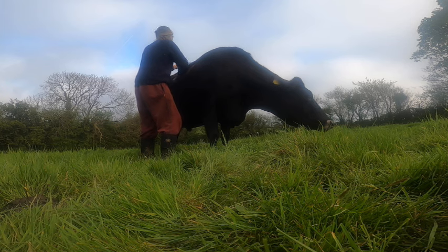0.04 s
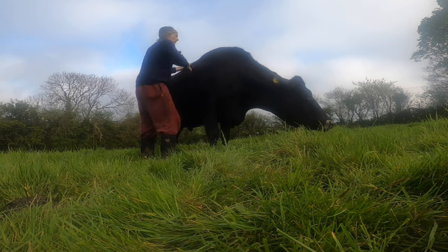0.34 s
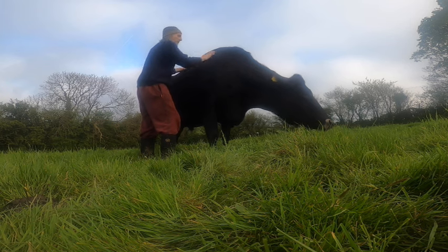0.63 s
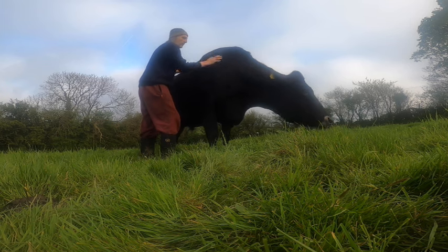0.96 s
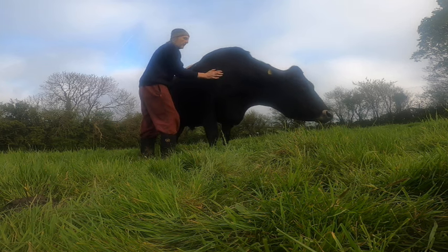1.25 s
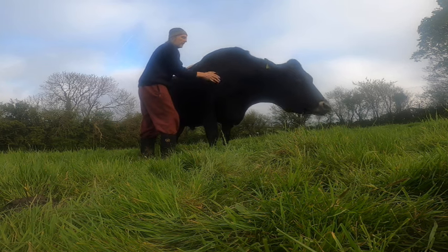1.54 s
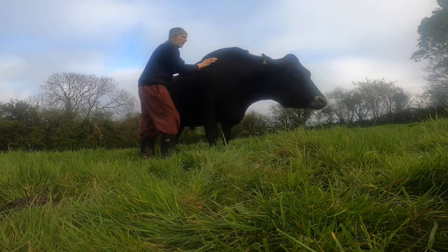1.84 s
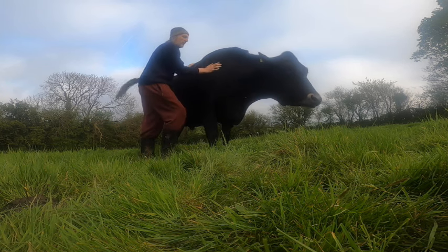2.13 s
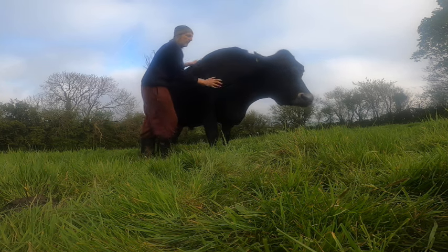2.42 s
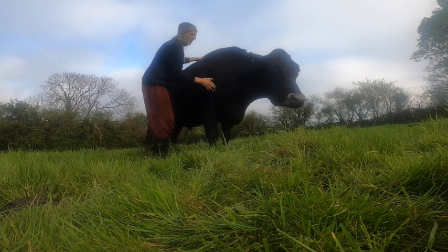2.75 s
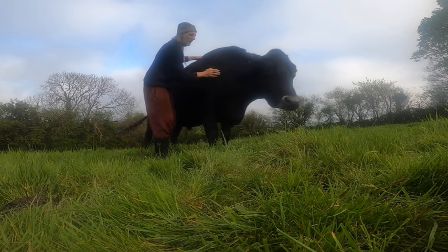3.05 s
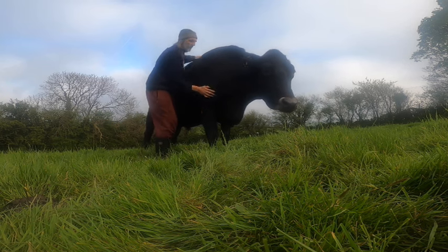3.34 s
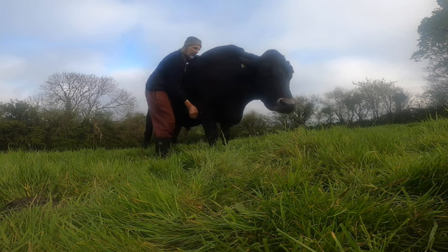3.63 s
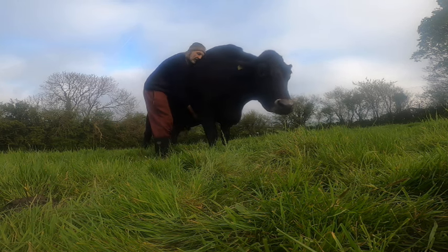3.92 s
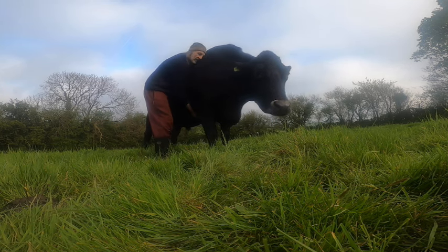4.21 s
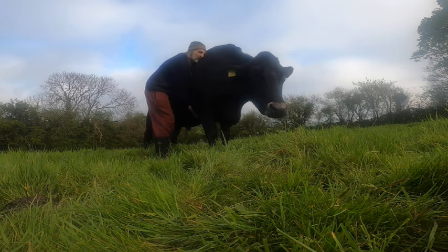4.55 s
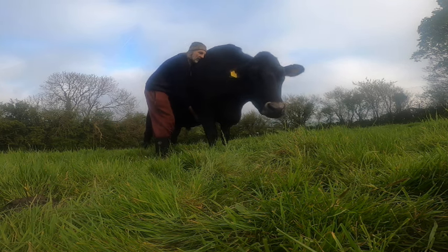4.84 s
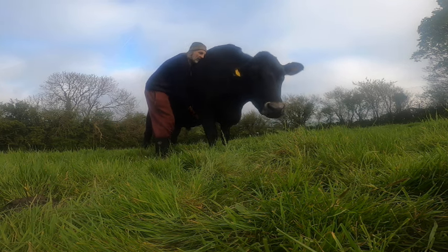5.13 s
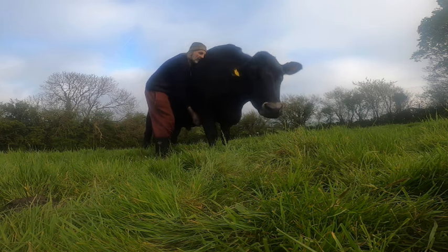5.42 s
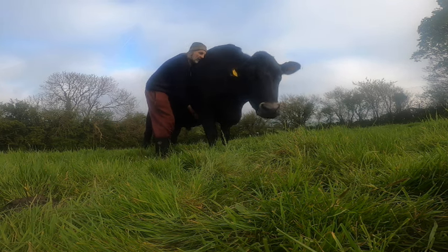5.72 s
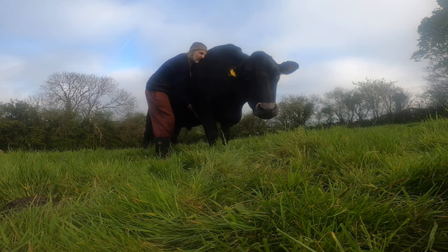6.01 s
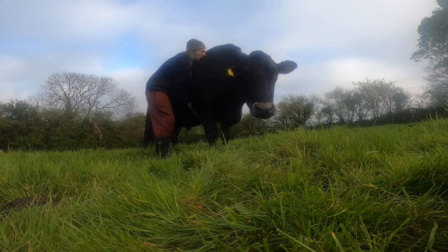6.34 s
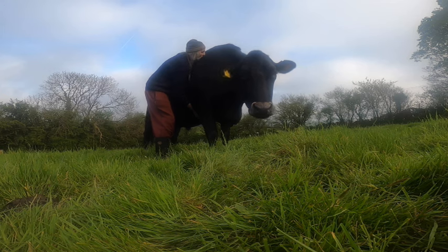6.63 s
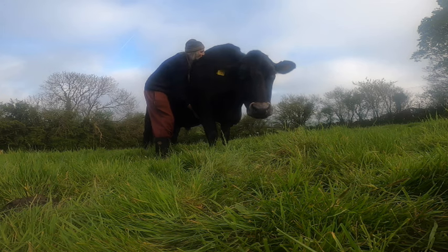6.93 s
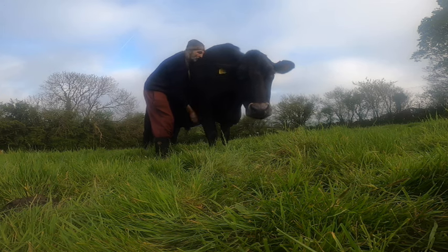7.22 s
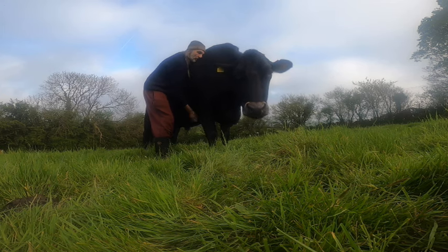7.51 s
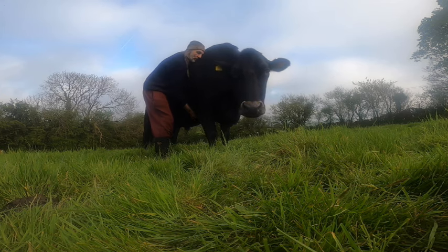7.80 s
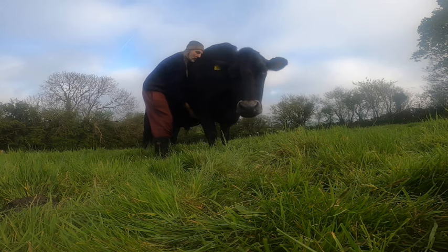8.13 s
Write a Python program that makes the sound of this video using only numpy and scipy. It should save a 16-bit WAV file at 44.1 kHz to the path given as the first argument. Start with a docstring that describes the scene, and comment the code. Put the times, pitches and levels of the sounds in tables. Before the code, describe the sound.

Fluting, trilling birdsong carries over a pasture, with far engine drone and wind on the microphone that stop partway through.

```python
"""Pasture birdsong

A blackbird flutes and trills in gliding near-pure tones; others answer and wheeze from the hedges, and a small
bird repeats high slurs. Twigs blur the notes and trees echo them. Distant engines drone and wind buffets a
microphone low in the grass; near five seconds the bass, engines and buffeting alike, drops away abruptly. Grass
rustles and ticks as blades brush and stalks snap, and a hand pats a cow with dull thuds."""
import sys
import numpy as np
from scipy import signal
from scipy.fft import rfft, irfft, next_fast_len
from scipy.io import wavfile
from scipy.ndimage import uniform_filter1d

SR = 44100
rng = np.random.default_rng(int(sys.argv[2]) if len(sys.argv) > 2 else 0)


def waveform_to_disk(signal):
    """Save audio, clipped to [-1, 1], as 16-bit WAV at the path in sys.argv[1]."""
    frames = np.transpose(np.atleast_2d(signal))
    scaled = np.clip(frames, -1, 1) * 32767
    samples = np.round(scaled).astype(np.int16)
    wavfile.write(sys.argv[1], SR, samples)


N = 360076
TIME = np.arange(N) / SR
BASS_DROP_S, BASS_FALL_S = 4.865, 0.02  # the bass, engines and buffeting alike, drops away abruptly


def undb(db):
    """Decibels to gain."""
    return 10 ** (np.asarray(db) / 20)


def unit(x):
    """Scale to rms 1."""
    return x / np.sqrt(np.mean(x ** 2))


def pan(db):
    """Stereo gains, left over right by db."""
    return undb(np.array([[db], [-db]]) / 2)


def walk(rate_hz):
    """Smooth random drift, spread near 1."""
    k = max(int(SR / rate_hz), 1)
    steps = np.repeat(rng.standard_normal(N // k + 1), k)
    return 1.36 * uniform_filter1d(uniform_filter1d(steps, k), k)[:N]


def noise(spectrum, correlation):
    """Coloured stereo noise; correlation 1 is mono."""
    size = next_fast_len(N)
    hz, db = np.transpose(spectrum)
    f = np.fft.rfftfreq(size, 1 / SR) + 1
    gain = undb(np.interp(np.log(f), np.log(hz), db)) / (1 + (f / (2 * hz[-1])) ** 2)
    mid, side = irfft(rfft(rng.standard_normal((2, size))) * gain, size)[:, :N]
    width = np.sqrt((1 - correlation) / (1 + correlation))
    return unit(mid) + width * unit(side) * np.array([[1], [-1]])


def add(track, start_s, sound):
    """Mix a sound into a track."""
    i = max(int(start_s * SR), 0)
    track[i:i + len(sound)] += sound[:N - i]


def lagged(x, lag_ms):
    """Fractional-sample delay."""
    size = next_fast_len(N + SR)
    khz = np.fft.rfftfreq(size, 1000 / SR)
    return irfft(rfft(x, size) * np.exp(-2j * np.pi * khz * lag_ms), size)[:N]


def held(start_s, end_s, rise_s, fall_s):
    """Trapezoid envelope; the fall begins at end_s."""
    return np.clip((TIME - start_s) / rise_s, 0, 1) * np.clip(1 - (TIME - end_s) / fall_s, 0, 1)


def swells(rows):
    """Envelope with one smooth hump per row."""
    out = np.zeros(N)
    for s, length_s, db in rows:
        add(out, s, undb(db) * np.hanning(int(length_s * SR)))
    return out


def bass_gate():
    """1 until the bass drops away, then a fast ramp to 0."""
    return np.clip(1 - (TIME - BASS_DROP_S) / BASS_FALL_S, 0, 1)


def whistle(hz, attack_s, release_s):
    """Sine on a pitch contour, with soft ends."""
    t = np.arange(len(hz)) / SR
    gate = np.clip(t / attack_s, 0, 1) * np.clip((t[-1] - t) / release_s, 0, 1)
    return np.sqrt(2) * np.sin(np.pi / 2 * gate) ** 2 * np.sin(2 * np.pi * np.cumsum(hz) / SR)


def fluting(notes, attack_share, release_s, waver, trill_dip, swell_db, rasp):
    """Notes swell and bend; each trill cycle flicks the pitch up and dips the level."""
    # name: start/mid pitch, end/mid pitch, lean (<1 bends early)[, trill/Hz, depth, dip lead/rad]
    gestures = { "hold": (0.95, 0.97, 1), "droop": (1.05, .9, 0.97), "sink": (1.06, 0.774, 0.93),
                "scoop": (1.08, 1.06, 0.96), "sag": (1.18, .94, 1), "rise": (.94, 1.06, 1),
                "lift": (.8, 1.04, .7), "climb": (.82, 1.16, 1), "crest": (.87, .83, .66),
                "chip": (1.345, 0.78, .7, 106, 0.069, 1.5), "trill": (1.06, 1.1, 0.5, 54, .065, 0.5),
                "roll": (0.73, 0.93, 1, 46.5, .1, 0.3), "warble": (1.07, .96, 1, 40.5, 0.046, 0.75),
                "quaver": (1.01, .975, 1.05, 33, .035, 0.76), "buzz": (1, 1, 1, 52, 0.0226, .5)}
    out, drift, shake = np.zeros(N), walk(150), walk(900)
    for s, length_s, gesture, mid_hz, db in notes:
        start, end, lean, *trill = gestures[gesture]
        trill_hz, depth, lead_rad = trill or (0, 0, 0)
        t = np.arange(int(length_s * SR)) / SR
        now = slice(int(s * SR), int(s * SR) + len(t))
        parabola = np.polyfit([0, .5, 1], [start, 1, end], 2)
        bend = np.polyval(parabola, (t / length_s) ** lean)
        phase = 2 * np.pi * trill_hz * t
        flick = depth * (np.exp(np.sin(phase)) - 1 + rasp * shake[now])  # deep trills turn raspy
        hz = mid_hz * (bend + flick) * (1 + waver * drift[now])
        tone = whistle(hz, attack_share * length_s, min(release_s, length_s / 3))
        pulsing = 1 - trill_dip * np.sin(phase + lead_rad) if trill else 1
        swell = undb(db - swell_db * (2 * t / length_s - 1) ** 2)
        add(out, s, swell * tone * pulsing)
    return out


def outdoors(x, pan_db, lag_ms, echo_db, t60_s, flutter_db, scatter_db, scatter_s):
    """Moving air flutters the level, twigs blur it, trees echo; the left channel lags."""
    x = x * undb(flutter_db * walk(45))
    t = np.arange(SR) / SR
    twigs = rng.standard_normal((2, SR)) * t * np.exp(-t / scatter_s)
    trunks = rng.standard_normal((2, SR)) * (rng.random(SR) < 150 / SR)  # about 150 echoes/s
    trees = trunks * np.exp(-np.log(1000) * t / t60_s) * (1 - np.exp(-t / 0.043))
    tail = (undb(scatter_db) * unit(twigs) + undb(echo_db) * unit(trees)) / np.sqrt(SR)
    echo = signal.fftconvolve(x[None], tail, axes=1)[:, :N]
    direct = np.array([lagged(x, lag_ms), x])
    return (direct + echo) * pan(pan_db) / np.hypot(1, undb(scatter_db))


def air(wind_start_s=1.98, wind_db=-38.5, far_db=-49, calm_db=-78):
    """Eddies buffet the microphone, mostly on the right, over a far rumble and hissing grass."""
    # wind gusts: t/s, length/s, level/dB
    gust_times = [(1.9, 0.9, -50), (3.58, 0.38, -38), (4.17, 0.15, -39.5), (4.5, 0.68, -47)]
    # breezes over the grass: start/s, end/s, level/dB
    breezes = [(-.2, 0.876, -65.5), (0.997, 1.96, -69.5), (3.788, 5.06, -69)]
    # noise spectra: f/Hz, density/dB
    buffet_spectrum = [(8, 5), (22, 0), (40, -10), (65, -14.5), (130, -24), (250, -47)]
    rumble_spectrum = [(20, -15), (45, 4), (70, 0), (115, -2.5), (170, -7.5), (230, -16.5), (300, -29.5),
                       (600, -43)]
    hiss_spectrum = [(300, 14), (1000, 6.5), (3000, 11.5), (4600, 7.5), (7500, 1.5), (9500, -4),
                     (12000, -10), (15500, -24)]
    field_spectrum = [(200, 7), (400, 6), (620, -3.5), (800, -9.5), (1300, -2), (2100, 4), (3000, -13.5),
                      (3900, -7.5), (7000, -16.5), (15000, -27.5)]
    blowing = held(wind_start_s, BASS_DROP_S, rise_s=0.041, fall_s=BASS_FALL_S)
    gusts = swells(gust_times)
    buffet = blowing * (undb(wind_db) + gusts) * noise(buffet_spectrum, correlation=0.85) * pan(-10)
    rumble_gain = (undb(far_db) + undb(-5.5) * blowing * gusts) * undb(1.7 * walk(6))
    rumble = rumble_gain * noise(rumble_spectrum, correlation=0.88)
    breeze = sum(undb(db) * held(start, end, rise_s=0.053, fall_s=0.31) for start, end, db in breezes)
    hiss = (undb(calm_db) + breeze) * undb(1.5 * walk(13)) * noise(hiss_spectrum, correlation=0.07)
    field = undb(-69.5 + 1.78 * walk(2.12)) * noise(field_spectrum, correlation=0.086)
    left, right = hiss + field
    return buffet + rumble + np.array([lagged(left, lag_ms=0.14), right])


def hum(fade_s=0.94, late_hz=228.8, late_db=-69):
    """A faint wavering hum dies away; a lower one holds after the bass drops."""
    # opening hum lines: f/Hz, level/dB
    lines = [(394, -67.5), (700, -76)]
    clock_s = np.cumsum(1 + 0.0058 * walk(30)) / SR
    early = sum(undb(db + 3.5 * walk(15)) * np.sin(2 * np.pi * hz * clock_s) for hz, db in lines)
    late = undb(late_db + 2.0 * walk(6.3)) * np.sin(2 * np.pi * late_hz * clock_s)
    return np.exp(-TIME / fade_s) * early + (1 - bass_gate()) * late


def sizzle(start_s=4.88, fade_s=.55, db=-75):
    """A thin band of high noise sets in and fades."""
    # sizzle spectrum: f/Hz, density/dB
    spectrum = [(7000, -22), (8700, 3), (9600, -1), (11000, -18), (15000, -21)]
    envelope = np.exp(-np.abs(TIME - start_s) / fade_s) * (TIME > start_s)
    return undb(db + 2 * walk(60)) * envelope * noise(spectrum, correlation=0.18)


def engines(start_s=.5, start_hz=62.05, top_hz=100.4, pickup_s=6.0, drone_hz=58.06, waver_db=1.8):
    """Two receding engines, one speeding up, one steady; only two harmonics of each carry this far."""
    running_s = TIME - start_s
    firing_hz = top_hz + (start_hz - top_hz) * np.exp(-running_s / pickup_s)
    phase = 2 * np.pi * np.cumsum(firing_hz * (1 + 0.0071 * walk(8))) / SR
    gain = np.clip(running_s / 0.045, 0, 1) * undb(-42.5 - 1.3 * running_s + waver_db * walk(7.07))
    labouring = gain * (np.sin(phase) + undb(-15.5) * np.sin(2 * phase))
    phase = 2 * np.pi * np.cumsum(drone_hz * (1 + 0.0131 * walk(7.99))) / SR
    gain = undb(-39 - 3.5 * TIME + waver_db * walk(6.22))
    drone = gain * (np.sin(phase) + undb(-12.5) * np.sin(2 * phase))
    return np.sqrt(2) * (labouring + drone) * bass_gate() * pan(3)


def grass(grain_db=2.5, ring_q=1 / 0.36):
    """Blades brush in grainy swells; single stalks snap and ring briefly."""
    # stalk snaps: t/s, peak/dB, f/Hz, decay/s
    stalks = [(0.712, -41.5, 4550, 0.0027), (3.741, -41, 2170, 0.0024), (3.821, -27.5, 3400, 0.0014),
              (3.877, -45, 2820, .004), (3.956, -39.5, 2800, 0.0045), (4.197, -43.5, 3470, 0.0026),
              (4.225, -36, 1770, 0.0036), (4.874, -40, 4500, 0.00034)]
    # grass and coat brushing: t/s, length/s, level/dB
    rustles = [(.74, 0.21, -66.5), (1.02, 0.18, -70), (1.15, 0.13, -65), (1.74, 0.21, -76.5),
               (2.34, 0.1, -68.5), (2.43, 0.07, -63), (2.57, 0.11, -68.5), (3.84, 0.35, -64.5),
               (4.21, 0.053, -60), (4.335, 0.056, -64), (4.45, 0.097, -58), (4.52, 0.053, -60),
               (4.68, 0.1, -62.5)]
    # blade spectrum: f/Hz, density/dB
    spectrum = [(400, -7), (1500, 1), (4000, 8), (7000, 0), (9300, -1.5), (10400, -8), (12000, -6.5),
                (14500, -16), (15500, -21)]
    snaps, t = np.zeros((2, N)), np.arange(SR // 50) / SR
    for s, db, hz, decay_s in stalks:
        resonance = signal.iirpeak(hz, ring_q, fs=SR)
        for channel in snaps:
            burst = rng.standard_normal(len(t)) * np.exp(-t / decay_s)
            crack = uniform_filter1d(signal.lfilter(*resonance, burst), size=2)
            add(channel, s, undb(db) * crack / np.abs(crack).max())
    grains = unit(undb(grain_db * walk(500)))
    brushing = swells(rustles) * grains * noise(spectrum, correlation=0.17)
    return brushing * pan(-4) + snaps * pan(3)


def pats(attack_s=0.00021, decay_s=0.013):
    """Soft blows of a hand on a cow's hide give short dull thuds."""
    # pats and bumps: t/s, level/dB
    blows = [(1.419, -60), (1.447, -47.5), (2.397, -54.5), (2.569, -57.5), (2.763, -54), (3.742, -51),
             (3.819, -46), (3.958, -51), (4.227, -61)]
    # hide spectrum: f/Hz, density/dB
    spectrum = [(60, -23), (150, -2), (330, 10.5), (700, 4), (1400, -6), (4000, -9.5), (8000, -22.5),
                (15000, -50)]
    envelope, t = np.zeros(N), np.arange(SR // 5) / SR
    for s, db in blows:
        add(envelope, s, undb(db) * np.exp(-t / decay_s) * (1 - np.exp(-t / attack_s)))
    return envelope * noise(spectrum, correlation=0.3) * pan(-4)


def far_chorus(low_hz=1750, high_hz=4500, db=-66.5, count=380, fade_db_per_s=1.2, waver=.012):
    """Many faint, distant birds whistle random glides; the chorus slowly fades."""
    out, drift = np.zeros(N), walk(200)
    for when, pitch, glide, length, softness in rng.random((count, 5)):
        u = np.linspace(-1, 1, int((.04 + .1 * length) * SR))
        bend = 1 + 0.3027 * (glide - .6) * u - 0.0591 * u ** 2
        wobble = 1 + waver * drift[int(when * (N - len(u))):][:len(u)]
        hz = low_hz * (high_hz / low_hz) ** pitch * bend * wobble
        tone = whistle(hz, attack_s=0.019, release_s=0.015)
        add(out, when * TIME[-1], undb(db - 3.4 * softness - 7 * pitch) * tone)
    return outdoors(out * undb(-fade_db_per_s * TIME), pan_db=8.5, lag_ms=0.098, echo_db=-4, t60_s=0.6,
                    flutter_db=4.5, scatter_db=-2, scatter_s=0.011)


def churr():
    """A far bird's hoarse two-voiced buzz swells and sinks."""
    # voices: t/s, length/s, gesture, mid f/Hz, level/dB
    notes = [(1.7, 0.426, "buzz", 3486, -63), (1.7, 0.42, "buzz", 4760, -72)]
    call = fluting(notes, attack_share=0.28, release_s=0.13, waver=0.0156,
                   trill_dip=0.38, swell_db=3, rasp=1)
    return outdoors(call, pan_db=5.5, lag_ms=0.02, echo_db=-5, t60_s=1.0,
                    flutter_db=2, scatter_db=-2, scatter_s=.01)


def hedge_birds():
    """Further singers flute from the hedges; a faint high echo lingers after the small bird's phrase."""
    # notes, the last being the small bird's echo: t/s, length/s, gesture, mid f/Hz, level/dB
    notes = [ (.03, 0.25, "scoop", 1687, -70), (.06, 0.12, "rise", 2490, -68), (.19, .2, "rise", 1880, -64),
             (.395, 0.12, "droop", 2720, -55), (.875, 0.23, "sag", 1902, -64),
             (1.2, 0.15, "rise", 2037, -63), (1.53, .097, "droop", 2570, -59.5),
             (1.93, 0.096, "droop", 2670, -59.5), (2.21, .3, "hold", 1780, -65.5),
             (2.45, 0.32, "buzz", 2570, -58), (2.75, 0.18, "sag", 1892, -58),
             (2.95, .15, "warble", 2900, -63.5), (2.985, 0.16, "warble", 2106, -61),
             (3.135, 0.059, "lift", 2244, -54.5), (3.135, 0.063, "rise", 3045, -59),
             (3.33, 0.14, "crest", 2614, -67.5), (3.32, .1, "lift", 4540, -70.5),
             (3.45, 0.086, "lift", 4590, -69), (3.535, .12, "hold", 2313, -57.5),
             (3.68, .14, "rise", 8350, -76), (3.815, .07, "hold", 2154, -54), (4.0, .18, "hold", 8260, -76),
             (5.07, .25, "buzz", 2073, -62.5), (5.57, 0.22, "crest", 2170, -59),
             (6.16, 0.23, "crest", 2567, -58.5), (7.06, 0.19, "hold", 4480, -74.5)]
    song = fluting(notes, attack_share=0.2, release_s=0.018, waver=0.0082,
                   trill_dip=0.48, swell_db=1.5, rasp=0.7)
    return outdoors(song, pan_db=4.5, lag_ms=0.035, echo_db=-8, t60_s=1.0,
                    flutter_db=2.5, scatter_db=-7, scatter_s=0.015)


def hoarse_bird(rasp=0.027):
    """A rough whistle climbs, flicks up to a point and scatters in the hedge."""
    # wheezes: t/s, length/s, level/dB
    wheezes = [(0.719, .105, -52), (3.831, .15, -55), (7.265, .095, -56.5)]
    # wheeze contour: share of length, f/Hz, level/dB
    contour = [(0, 2800, -15.5), (.45, 3210, -1.5), (.7, 3640, 3), (.8, 4290, 1), (.88, 3720, 2.5),
               (1, 3640, -9)]
    out, shake = np.zeros(N), walk(900)
    shares, pitches_hz, levels_db = np.transpose(contour)
    for s, length_s, db in wheezes:
        along = np.linspace(0, 1, int(length_s * SR))
        hz = np.interp(along, shares, pitches_hz) * (1 + rasp * shake[int(s * SR):][:len(along)])
        gain = undb(db + np.interp(along, shares, levels_db))
        add(out, s, gain * whistle(hz, attack_s=.01, release_s=.008))
    return outdoors(out, pan_db=5.5, lag_ms=0.09, echo_db=-11, t60_s=0.32,
                    flutter_db=3, scatter_db=-7, scatter_s=0.01)


def syllable(name, waver=.007, tilt_db_per_octave=-1):
    """One high whistled slur, wavering differently each time."""
    # pitch contours by name: t/s from onset, f/Hz
    contours = { "slur": [(0, 7120), (.01, 5450), (.018, 4740), (.055, 4550), (.085, 3790)],
                "step": [(0, 6770), (.016, 5620), (.034, 5600), (.052, 3890), (.065, 3680), (.1, 3590)],
                "dip": [(0, 7350), (.012, 6000), (.026, 4410), (.062, 4600), (.09, 3460)],
                "hook": [(0, 7060), (.01, 4610), (.02, 3790), (.05, 3780), (.08, 4020)],
                "flick": [(0, 5710), (.016, 4400), (.032, 3850)], "fall": [(0, 6010), (.012, 5160),
                (.055, 4850)], "sag": [(0, 6180), (.012, 4790), (.066, 4330)], "swoop": [(0, 5950),
                (.014, 4400), (.045, 4750), (.08, 4460)], "arch": [(0, 4100), (.015, 4670), (.04, 4200)],
                "pip": [(0, 3950), (.011, 4260), (.035, 3900)], "lilt": [(0, 4600), (.027, 6980),
                (.04, 6400), (.056, 4200)], "peep": [(0, 7850), (.025, 8940), (.055, 8500)]}
    times_s, pitches_hz = np.transpose(contours[name])
    t = np.arange(int(times_s[-1] * SR)) / SR
    glide_hz = uniform_filter1d(np.interp(t, times_s, pitches_hz), size=200)
    hz = glide_hz * (1 + waver * walk(200)[:len(t)])
    gain = undb(tilt_db_per_octave * np.log2(hz / hz.mean()))
    return gain * whistle(hz, attack_s=0.0057, release_s=0.0097)


def small_bird(tag_after_s=.118, tag_db=-5.5):
    """Steep high slurs from stock syllables; most long ones get a softer tag."""
    # song: t/s, syllable, level/dB
    song = [(.612, "fall", -72), (2.13, "fall", -72.5), (3.065, "fall", -73.5), (3.612, "sag", -62.5),
            (4.643, "lilt", -67), (4.651, "arch", -60), (4.873, "flick", -62.5), (5.163, "hook", -56),
            (5.407, "fall", -70), (5.524, "slur", -57.5), (5.718, "flick", -70), (5.87, "step", -59),
            (6.215, "dip", -62), (6.513, "slur", -61), (6.836, "step", -60), (6.885, "peep", -76.5),
            (6.903, "arch", -57.5), (6.964, "flick", -63), (7.002, "pip", -59), (7.278, "fall", -73),
            (7.908, "swoop", -77)]
    # long syllable: its tag
    tags = {"hook": "pip", "slur": "flick", "step": "pip", "dip": "swoop"}
    out = np.zeros(N)
    for s, name, db in song:
        add(out, s, undb(db) * syllable(name))
        if name in tags:
            add(out, s + tag_after_s, undb(db + tag_db) * syllable(tags[name]))
    return outdoors(out, pan_db=9.5, lag_ms=0.17, echo_db=-13.0, t60_s=0.31,
                    flutter_db=2.5, scatter_db=-5.5, scatter_s=.024)


def blackbird_chips():
    """Short harsh calls that splash back from the hedge."""
    # chips: t/s, length/s, gesture, mid f/Hz, level/dB
    notes = [(4.535, 0.021, "climb", 3010, -45), (4.722, 0.025, "chip", 2850, -47),
             (4.774, 0.0246, "chip", 2550, -47.5), (4.823, 0.028, "chip", 2300, -50)]
    calls = fluting(notes, attack_share=0.12, release_s=.01, waver=0.018,
                    trill_dip=0.31, swell_db=4, rasp=.7)
    return outdoors(calls, pan_db=1.5, lag_ms=0.074, echo_db=-8.5, t60_s=0.96,
                    flutter_db=1.5, scatter_db=-4.5, scatter_s=0.0081)


def blackbird():
    """The nearest singer: fluted, trilled phrases with little blur."""
    # notes: t/s, length/s, gesture, mid f/Hz, level/dB
    notes = [ (.338, 0.064, "sink", 2020, -55.5), (.385, 0.095, "trill", 1870, -60),
             (.46, 0.11, "trill", 2185, -49), (.72, 0.046, "warble", 2880, -56.5),
             (.78, 0.05, "sink", 2950, -51), (1.183, 0.062, "droop", 1956, -55),
             (1.3, 0.046, "hold", 2380, -50), (1.345, 0.11, "warble", 2227, -53),
             (1.449, .1, "trill", 2163, -52.5), (1.61, .12, "hold", 2260, -47),
             (1.7, .11, "sink", 1975, -51.5), (1.845, 0.14, "droop", 2177, -48.5),
             (1.985, .13, "lift", 2194, -50), (3.775, 0.09, "scoop", 1725, -56.5),
             (3.868, 0.076, "hold", 2070, -43), (3.936, 0.089, "quaver", 2007, -47.5),
             (4.095, 0.15, "hold", 1766, -51), (4.219, .14, "roll", 2036, -48.5),
             (4.872, 0.11, "droop", 2053, -57), (5.25, .16, "climb", 2580, -48),
             (5.572, 0.087, "crest", 1775, -56), (5.833, 0.079, "droop", 2070, -51.5),
             (5.92, 0.137, "trill", 2130, -51), (6.04, 0.071, "droop", 2028, -44),
             (6.16, 0.16, "crest", 1862, -47.5), (6.297, 0.083, "quaver", 1658, -54),
             (6.475, 0.07, "sink", 2100, -48.5), (6.605, .16, "hold", 2304, -43.5),
             (7.225, 0.1, "buzz", 1745, -54.5), (7.285, 0.11, "hold", 1786, -50),
             (7.466, 0.1, "lift", 2335, -50.5), (7.532, 0.27, "quaver", 2410, -47),
             (7.848, 0.11, "lift", 2598, -45)]
    song = fluting(notes, attack_share=0.14, release_s=0.015, waver=0.0081,
                   trill_dip=0.53, swell_db=2, rasp=0.26)
    return outdoors(song, pan_db=1.5, lag_ms=0.083, echo_db=-12.5, t60_s=0.92,
                    flutter_db=2.5, scatter_db=-14, scatter_s=0.012)


def scene():
    """Birds, engines, wind and small movements in the field."""
    birds = blackbird() + blackbird_chips() + hedge_birds() + churr()
    birds = birds + hoarse_bird() + small_bird() + far_chorus()
    return birds + engines() + hum() + air() + sizzle() + grass() + pats()


def record(dry):
    """Steep low-pass at 15.7 kHz."""
    return signal.sosfilt(signal.ellip(10, .2, 70, 15700, fs=SR, output="sos"), dry)


dry = scene()
out = record(dry)
waveform_to_disk(out)
```